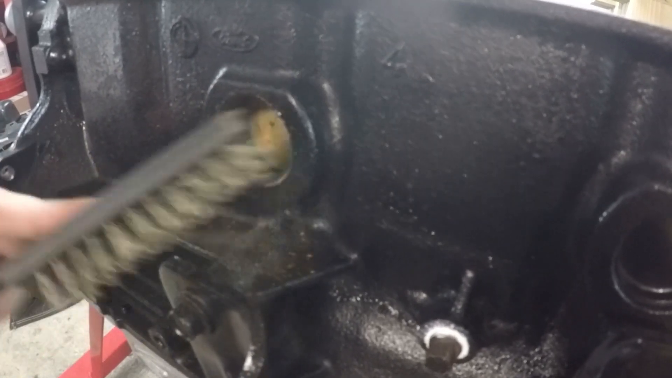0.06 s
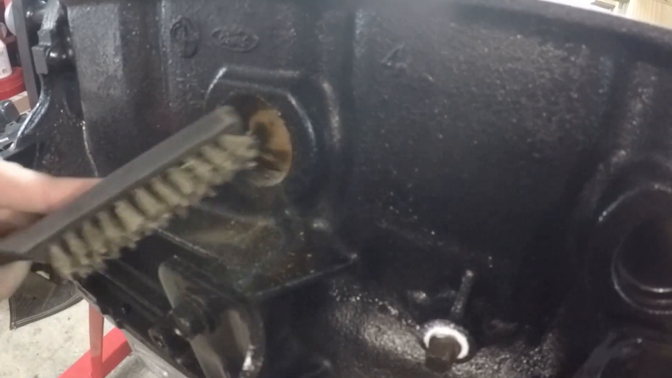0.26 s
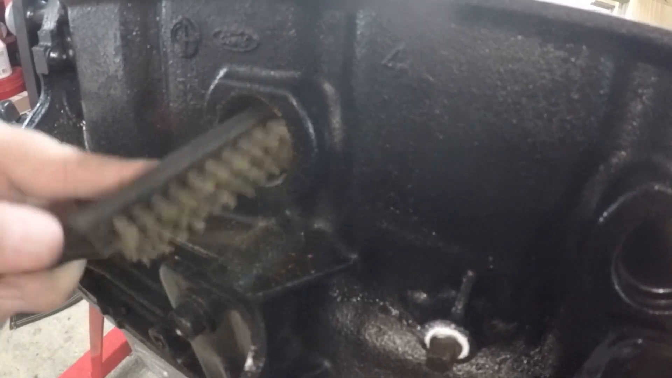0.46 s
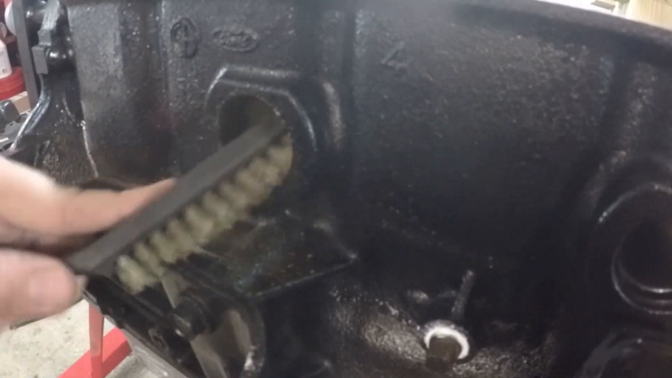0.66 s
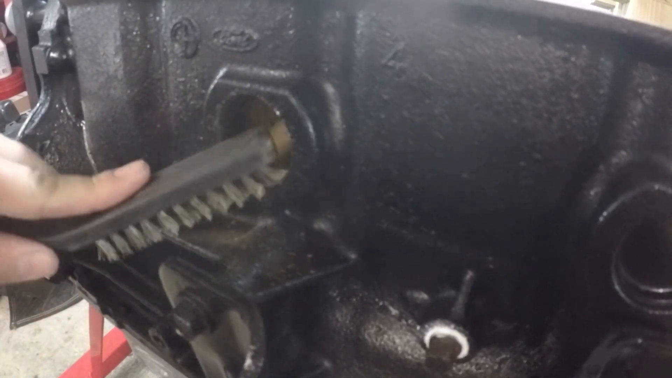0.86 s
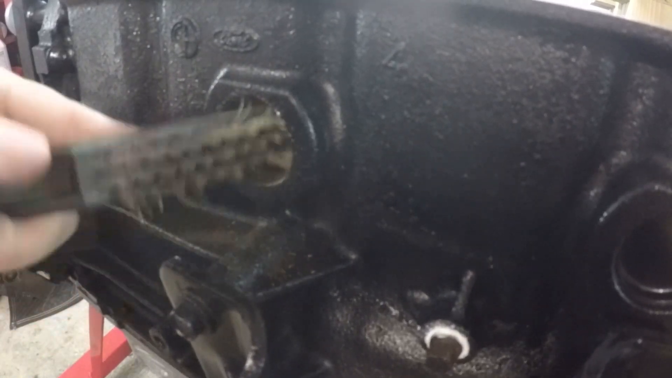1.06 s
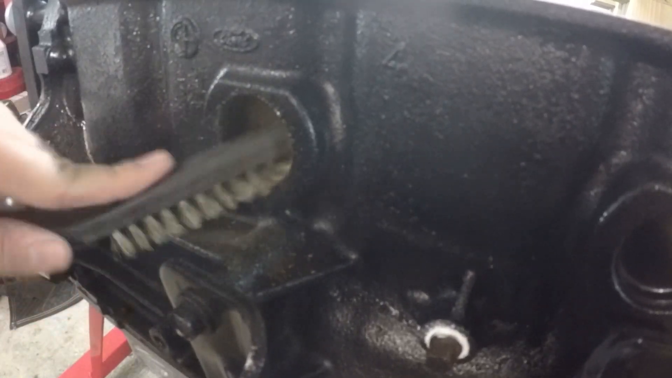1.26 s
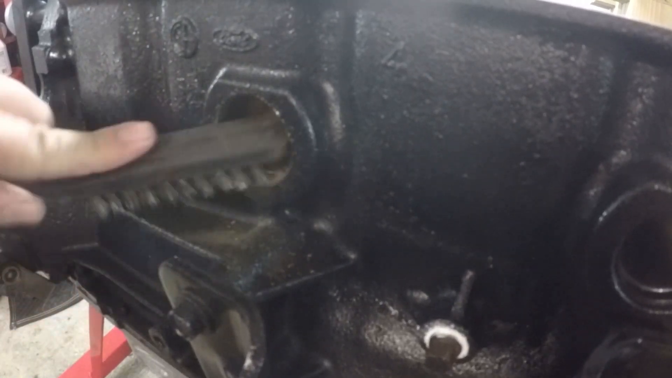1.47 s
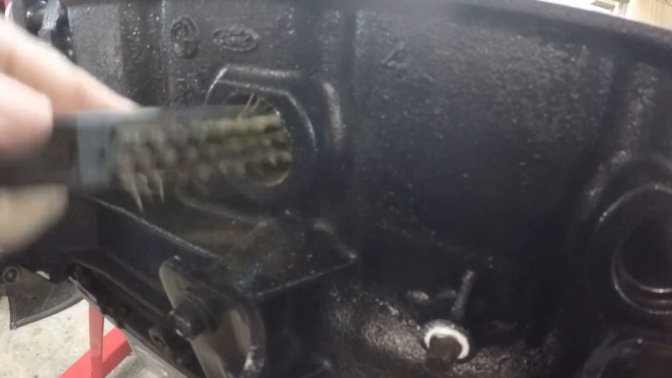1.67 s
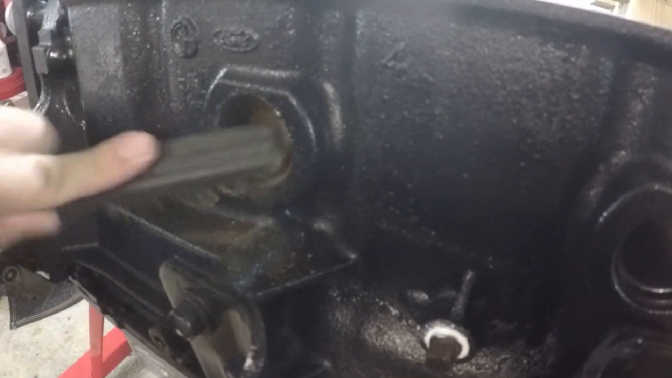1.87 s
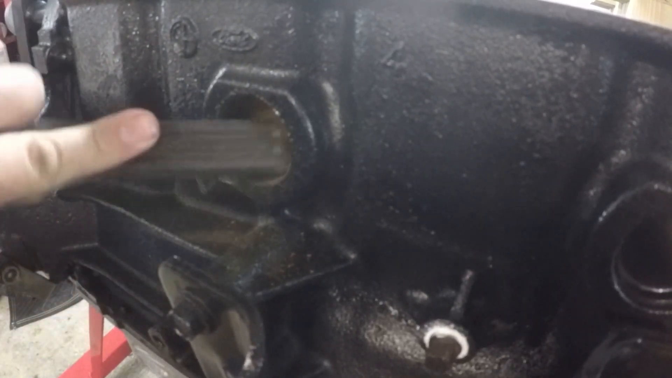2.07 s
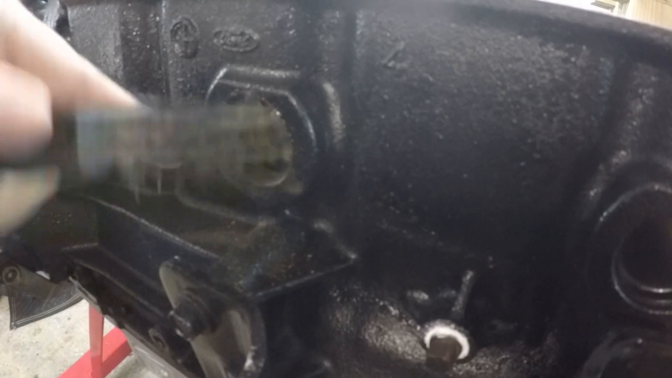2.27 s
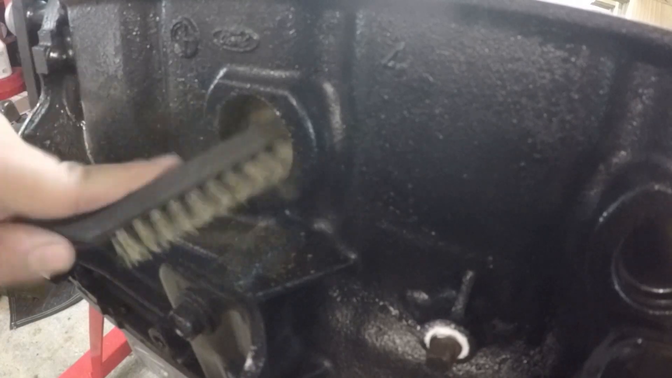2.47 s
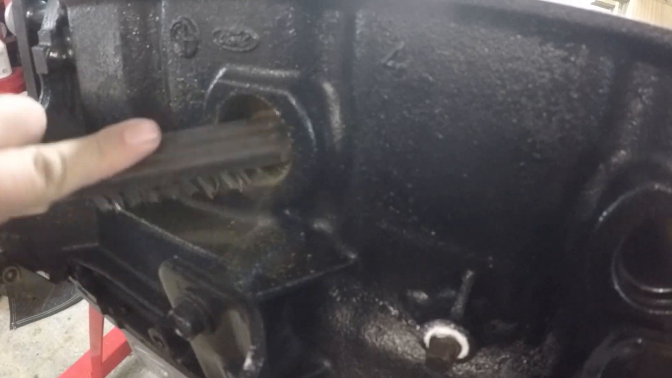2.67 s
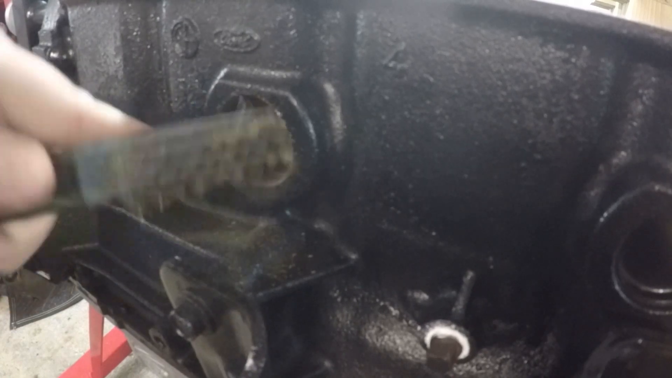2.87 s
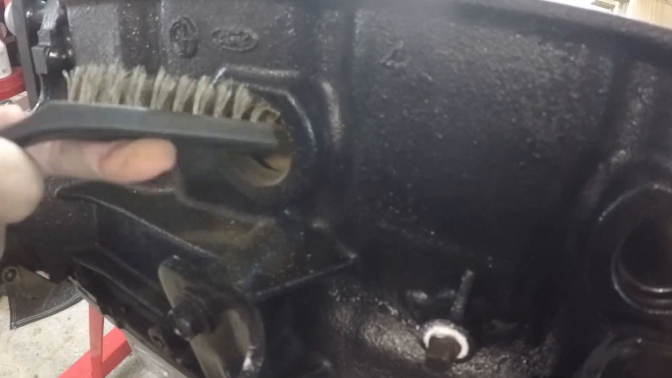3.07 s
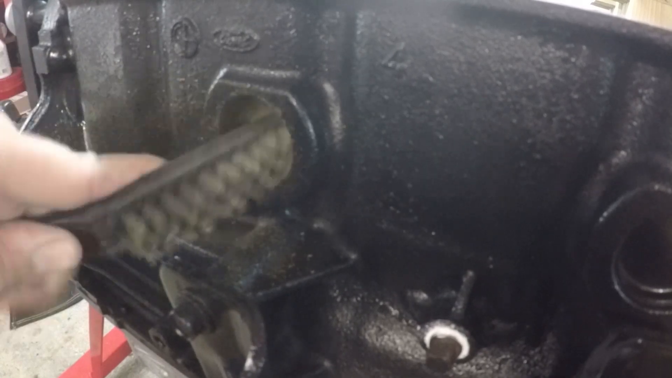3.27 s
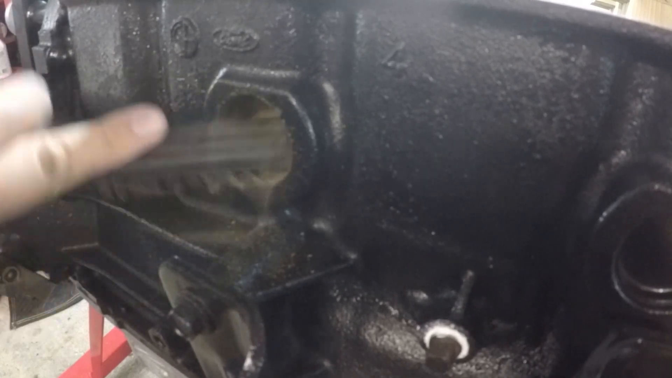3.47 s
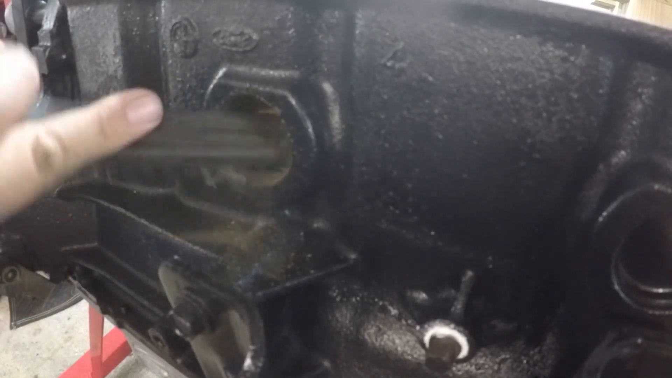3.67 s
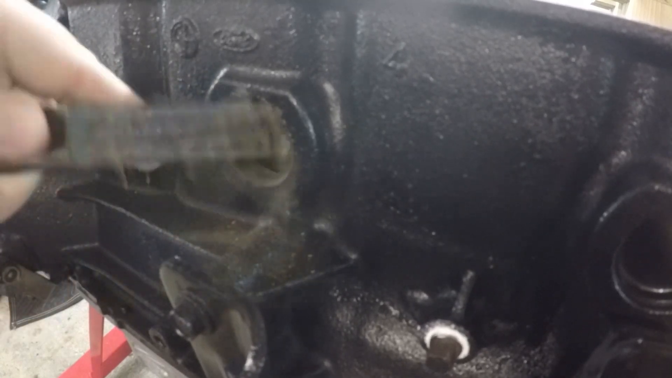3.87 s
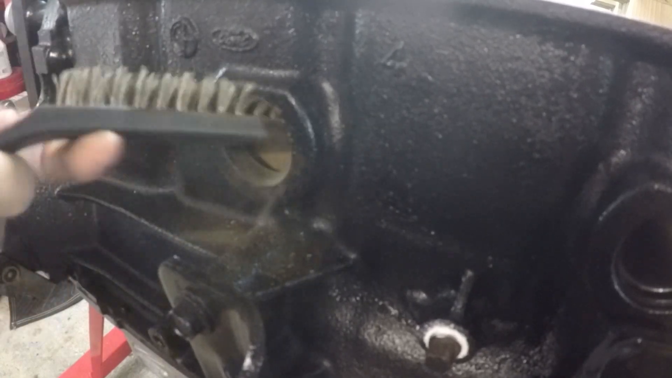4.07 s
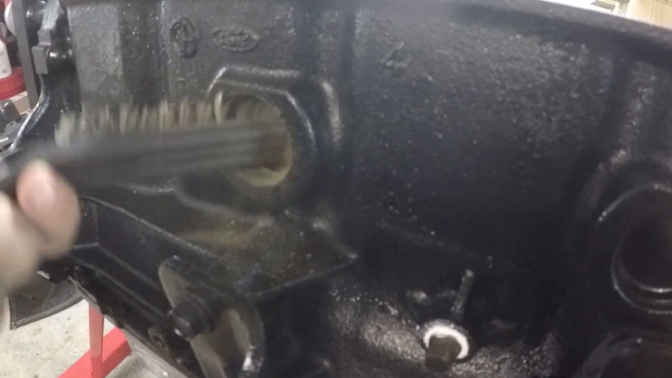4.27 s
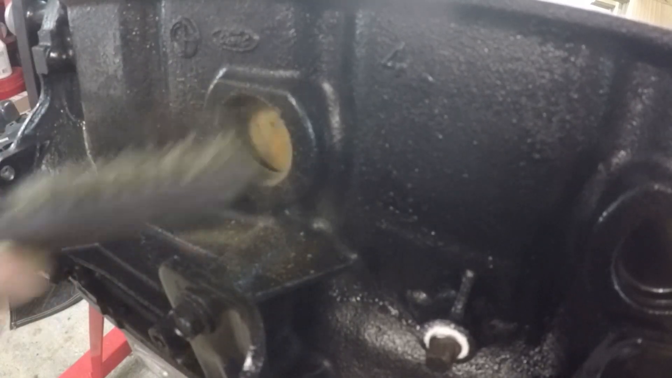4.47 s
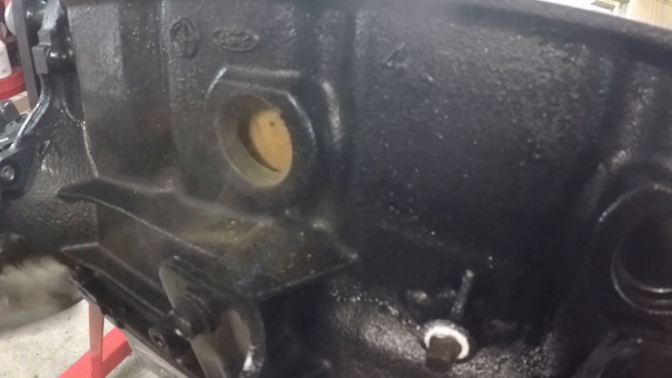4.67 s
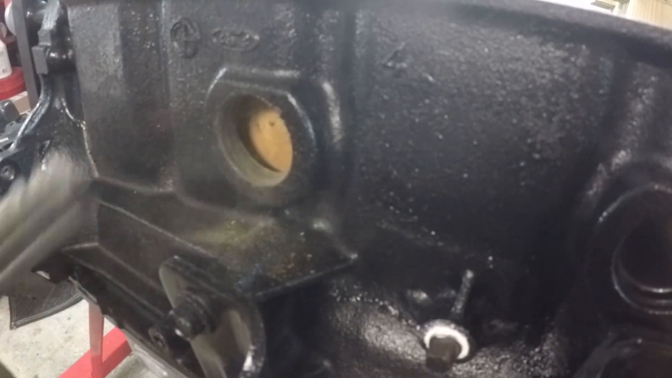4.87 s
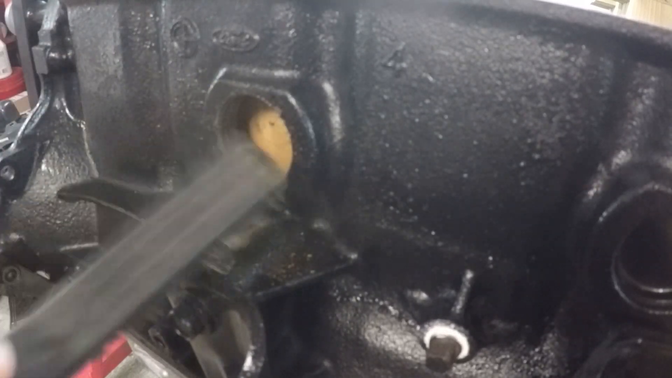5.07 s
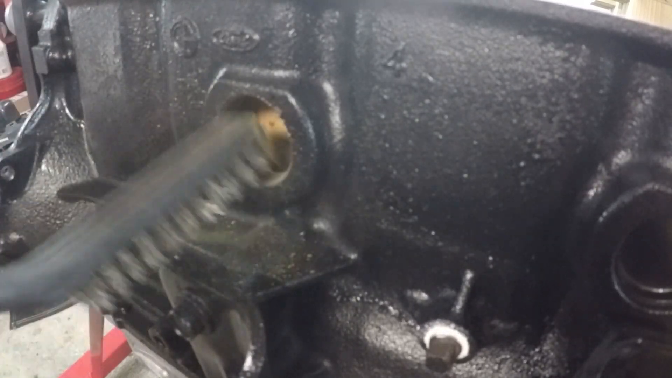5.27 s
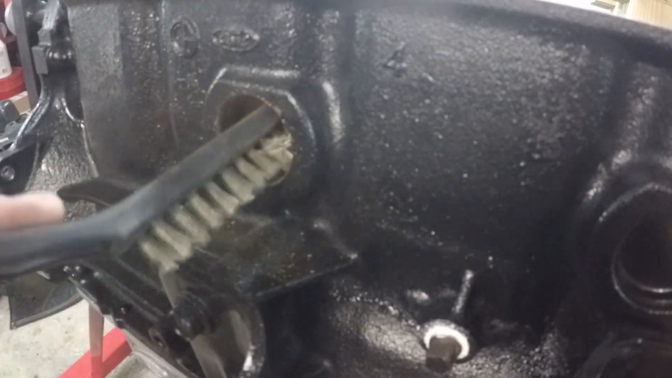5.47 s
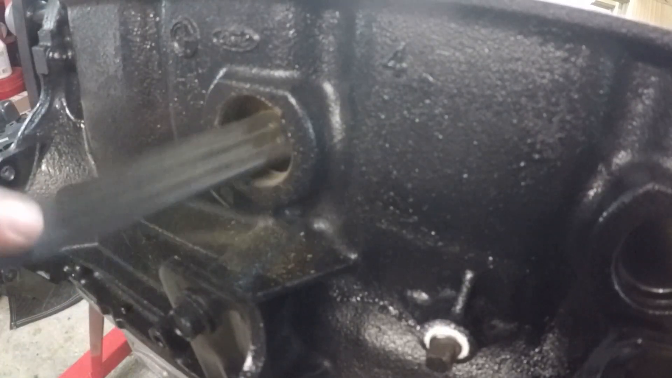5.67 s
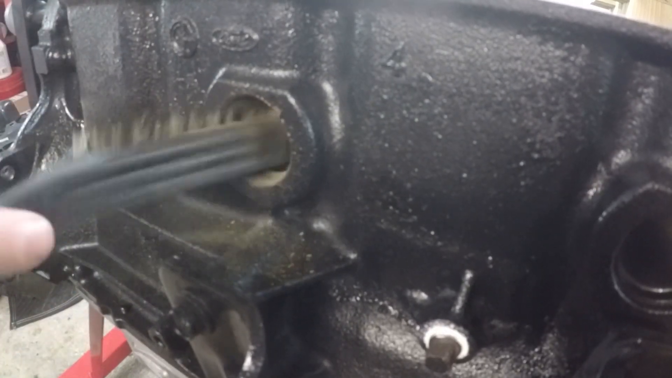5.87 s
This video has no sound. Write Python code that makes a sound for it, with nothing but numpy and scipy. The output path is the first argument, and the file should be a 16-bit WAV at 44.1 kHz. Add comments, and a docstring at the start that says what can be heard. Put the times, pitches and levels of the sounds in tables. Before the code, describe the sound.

A wire brush scrubs a hole in a cast-iron engine block with uneven, hissing, slightly hollow strokes. Bristles snap free and the handle knocks and rubs on the rim, making the iron ring faintly. After about four and a half seconds it stops on a sharp click. A pop hits the microphone, another click follows, and the scrubbing resumes. The sound is close, in a quiet garage.

```python
"""Wire brush in an engine block

A garage, one microphone close to a cast-iron block. A wire brush scrubs a bore in uneven strokes:
wire tips hiss and slip over the iron, tufts snap free and the bore sounds hollow. The handle
knocks and rubs the rim, the casting rings and its stand shakes. In a pause something pops
against the microphone. Faint room tone lies underneath."""
import sys
import numpy as np
from scipy import signal
from scipy.fft import rfft, irfft, next_fast_len
from scipy.io import wavfile
from scipy.ndimage import uniform_filter1d

SR = 44100
rng = np.random.default_rng(int(sys.argv[2]) if len(sys.argv) > 2 else 0)


def master_out(mix):
    """Clip the mix to full scale and print it as 16-bit PCM to the path in sys.argv[1]."""
    frames = np.transpose(np.atleast_2d(mix))
    ceiling = np.clip(frames, -1, 1)
    pcm = np.round(ceiling * 32767).astype(np.int16)
    wavfile.write(sys.argv[1], SR, pcm)


N = 260631
T = np.arange(N) / SR

# spectrum of wire tips on iron: f/Hz, level/dB
BRISTLE_SPECTRUM = [(1470, -18), (2500, -3), (2920, -12), (3690, 2), (4950, -1.5), (5520, 1.5), (6400, 2.5),
                    (11900, 2.5), (15300, -1), (15600, 21.5), (16000, -32)]


def brush_strokes():
    """Each stroke drives the wires, the hollow of the bore, the casting and the stand."""
    scrape_db, hollow_db, bright_db = stroke_pressure()
    rub = handle_rubs()
    load = gain_of(scrape_db - 21) + rub  # wires and handle bearing on the block
    wires = bristles(bright_db)
    bore = (gain_of(scrape_db + hollow_db) + gain_of(-10) * rub) * bore_hollow()
    force = noise() * (0.033 + slips(per_s=90, spread_db=0, t60=0.012)) * load
    ring = casting(force) / np.std(casting(noise()))
    stand = stand_rumble(load)
    return gain_of(scrape_db) * (wires + twisting_brush()) + bore + ring + stand


def stroke_pressure():
    """Scrape, hollow and brightness in dB: each stroke bites, swells, mostly sags, and lets go."""
    # start t/s, swell/s, sag/s, level/dB, change over the sag/dB, hollow/dB re scrape, treble tilt/dB
    strokes = [(-.05, 0.085, 0.021, -48.5, -11, -7, 0.5), (0.454, 0.039, 0.092, -57.5, -3, -1.5, 5),
               (.615, 0.044, 0.028, -52.5, 2, -5, 4), (.685, 0.034, 0.18, -45, -7.5, -12.5, -1),
               (0.967, 0.1, .09, -43.5, -11.5, -12, 0), (1.172, 0.057, 0.2, -44.5, -3, -12.5, -2),
               (1.512, 0.13, 0.077, -38, -7, -10.5, -1.5), (1.729, 0.15, 0.2, -44, -14, -9.5, 2.5),
               (2.069, 0.24, 0.07, -38.5, -1, -15.5, -2), (2.407, 0.092, 0.18, -44, -7, -14, 3),
               (2.745, 0.18, 0.22, -38.5, -9.5, -15.5, 0), (3.18, 0.068, .38, -39, -12.5, -14, -1),
               (3.699, 0.17, 0.34, -40.5, -6, -14.5, 0), (4.172, 0.067, 0.14, -45, -6, -14.5, -0.5),
               (4.404, 0.091, 0.042, -57.5, 1, -12, 3.5), (5.382, 0.2, 0.07, -46, -0.5, -16.5, 0),
               (5.624, 0.061, 0.072, -39.5, -5, -12, 3.5), (5.728, 0.075, 0.082, -40, -6.5, -15, 3.5),
               (5.857, 0.063, .08, -47.5, -3, -12.5, 4)]
    bite_db, attack_s, release_s = -7.5, 0.033, 0.04
    rest_db, touch_db = -66, -63  # wires quivering between strokes; wires resting on the iron
    in_bore = uniform_filter1d(1. * ((T > .9) & (T < 4.54)), size=800)
    power = gain_of(2 * rest_db) + gain_of(2 * touch_db) * in_bore
    hollow, bright = power * -3.5, power * -2  # tone at rest, weighted by power like the strokes
    for start, swell, sag, db, change_db, hollow_db, bright_db in strokes:
        top, end = start + swell, start + swell + sag
        contact = np.clip(np.minimum((T - start) / attack_s, (end - T) / release_s + .5), 0, 1)
        level_db = np.interp(T, [start, top, end], [db + bite_db, db, db + change_db])
        stroke_power = (contact * gain_of(level_db)) ** 2
        power += stroke_power
        hollow += stroke_power * hollow_db
        bright += stroke_power * bright_db
    return 10 * np.log10(power), hollow / power, bright / power


def bristles(bright_db):
    """Tips hiss and slip together; groups of wires ring in turns. bright_db tilts the treble."""
    # wire resonances of steady pitch: f/Hz, width/Hz, level/dB
    wire_modes = [(4954, 300, -2.5), (6580, 300, -3), (8270, 690, 1), (9780, 350, -2), (11290, 690, 0.5)]
    hiss = noise() * (0.8 + slips(per_s=240, spread_db=-0.5, t60=0.011))
    rings = sum(gain_of(db + 3.9 * drift(0.17)) * resonate(plucks(per_s=120), hz, width)
                for hz, width, db in wire_modes)
    wires = unit_rms(coloured(hiss, BRISTLE_SPECTRUM) + gain_of(-5.5) * unit_rms(rings))
    low = filtered(wires, 7000, "low")
    return low * gain_of(-bright_db / 2) + (wires - low) * gain_of(bright_db / 2)


def twisting_brush():
    """As the brush twists, single resonances of wires or bore swell, slide and fade."""
    # spells of ringing: from t/s, to t/s, centre f/Hz, level/dB re scrape
    spells = [(.08, 0.152, 528, 7), (0.409, 0.61, 1650, -10), (0.56, 0.71, 6620, 1),
              (0.654, 0.926, 8300, -7.5), (0.702, 1.053, 2420, -6.5), (1.049, 1.692, 8090, -9.5),
              (1.254, 1.586, 2290, -9), (1.495, 2.248, 5100, -20), (1.754, 2.547, 8200, -11),
              (1.849, 2.082, 2156, -10), (1.95, 2.301, 9100, -19), (2.101, 2.605, 3735, -15),
              (2.494, 2.95, 6540, -12), (2.596, 3.05, 5100, -11), (2.799, 3.35, 3800, -12),
              (2.808, 3.303, 1700, -24.5), (3.206, 3.336, 8300, -11), (3.271, 4.093, 6420, -9.5),
              (3.853, 4.098, 4870, -17), (4.041, 4.195, 3600, -9), (4.171, 4.393, 2965, -6),
              (4.43, 4.567, 3070, 3), (5.397, 5.528, 1438, -7), (5.402, 5.617, 9600, 4.5),
              (5.5, 5.845, 8050, -7), (5.542, 5.713, 6150, -10), (5.68, 5.912, 3606, -9.5)]
    max_slide = .04  # share of the pitch, either side of the centre
    out, bursts = np.zeros(N), plucks(per_s=220)
    for (start, end, centre_hz, db), way in zip(spells, rng.uniform(-1, 1, len(spells))):
        drive = bursts[round(start * SR):round(end * SR)]
        drive = drive * rng.choice([-1, 1], len(drive))
        hz = centre_hz * (1 + max_slide * way * np.linspace(-1, 1, len(drive)))
        width_hz = min(.12 * centre_hz, 220 + .045 * centre_hz)
        add(out, start, gain_of(db) * resonate(drive, hz, width_hz) * signal.windows.tukey(len(drive), .6))
    return out


def bore_hollow():
    """Slipping wires sound the hollow of the bore and the handle."""
    # spectrum of bore and handle: f/Hz, level/dB
    hollow_spectrum = [(530, 1), (900, 3.5), (1010, 4), (1130, 1), (1720, 3.5), (2200, 1.5), (3780, -1),
                       (4500, -4), (5850, -5), (9900, -120)]
    return coloured(noise() * (1.04 + slips(per_s=150, spread_db=3.5, t60=0.02)), hollow_spectrum)


def handle_knocks():
    """The handle hits the rim: a short crack, a rattle after it, and the casting struck."""
    # blows on the rim: t/s, level/dB, f/Hz, crack length/s, casting ring/dB re level
    knocks = [(0.194, -33.5, 850, 0.0015, -26), (0.45, -36, 982, 0.0015, -6), (.472, -32, 1500, 0.0018, -2),
              (0.487, -21.5, 1750, 0.0014, -13), (0.829, -26.5, 1480, 0.0015, -10),
              (1.055, -43, 870, 0.0046, 8), (1.211, -45.5, 600, 0.0011, 1), (1.284, -42.5, 800, 0.001, 2),
              (1.557, -15.5, 2080, 0.0011, -22), (1.625, -22.5, 1780, 0.0014, -13),
              (1.847, -47, 895, 0.0027, 10.5), (1.919, -46.5, 890, 0.0018, 5),
              (2.253, -21, 1630, 0.0015, -10.5), (2.331, -41, 900, 0.00099, -2),
              (2.423, -45, 706, 0.0018, -1), (2.544, -38, 810, 0.0012, -1.5),
              (3.343, -39.5, 1000, 0.0021, -24), (3.401, -42, 894, 0.0016, 5),
              (3.537, -53.5, 894, 0.0014, 15), (3.569, -45.5, 900, 0.0024, 9),
              (4.4987, -12, 2890, 0.0019, -26.5), (5.3886, -10, 2510, 0.00062, -30),
              (5.52, -26, 1750, 0.0012, -11.5), (5.562, -39, 894, 0.0025, -4.5)]
    out, blows, t = np.zeros(N), np.zeros(N), T[:1500]
    for start, db, hz, length, ring_db in knocks:
        progress = np.minimum(t / length, 1)
        tone = np.sin(2 * np.pi * hz * t) + 0.19 * np.sin(4 * np.pi * hz * t)
        crack = tone * np.sin(np.pi * progress) ** 2
        rattle = unit_rms(filtered(noise(len(t)), [hz / 3.9, hz * 1.3], "band"))
        rattle *= gain_of(-6) * decay(t, t60=0.011) * progress ** 2
        add(out, start, gain_of(db) * (crack + rattle))
        blow = np.exp(-2 * np.pi * hz * t)  # a duller knock pushes longer and wakes fewer high modes
        add(blows, start, gain_of(db + ring_db) * blow / blow.sum())
    return out + casting(blows)


def handle_rubs():
    """Gain of the handle rubbing the rim, swelling and fading in each spell."""
    # rubs on the rim: from t/s, to t/s, level/dB
    rubs = [(0.06, 0.4, -62), (0.386, 0.517, -49), (0.752, 0.91, -58), (0.952, 1.098, -53),
            (1.28, 1.456, -53), (1.515, 1.67, -69), (1.82, 2.12, -55), (2.116, 2.303, -48.5),
            (2.536, 2.681, -55.5), (2.835, 2.984, -56.5), (3.188, 3.26, -55), (3.38, 3.633, -53.5),
            (3.68, 3.948, -57), (4.47, 4.554, -65), (5.512, 5.596, -53.5), (5.69, 5.82, -53.5)]
    return sum(gain_of(db) * np.sin(np.pi * np.clip((T - start) / (end - start), 0, 1))
               for start, end, db in rubs)


def tuft_snaps():
    """A tuft springs free: a burst of bristle hiss with its own group of wires ringing on top."""
    # single tufts: t/s, level/dB
    snaps = [(0.0275, -33), (0.2506, -38), (0.519, -27.5), (0.5455, -29.5), (0.5727, -27), (.621, -38),
             (0.6364, -35), (0.6502, -29.5), (0.7003, -24.5), (0.8852, -31), (0.9902, -29.5),
             (1.0307, -27.5), (1.136, -25), (1.1892, -33), (1.2015, -25), (1.7725, -27.5), (1.8003, -28),
             (2.172, -23.5), (2.4074, -31), (2.7035, -40), (2.7684, -40), (3.1334, -28), (3.199, -33),
             (3.475, -29.5), (3.711, -34), (3.931, -22.5), (4.312, -32), (4.436, -35), (4.4982, -31.5),
             (4.79, -47), (4.91, -47.5), (5.1422, -28), (5.235, -44), (5.3497, -44), (5.373, -38),
             (5.423, -29), (5.442, -29.5), (5.4834, -35), (5.5019, -25), (5.5109, -23.5), (5.5358, -43),
             (5.563, -20.5)]
    # rushes of small tufts as the brush is forced in or out: from t/s, to t/s, lowest level/dB
    flurries = [(.95, 1.15, -33.5), (4.414, 4.545, -38.5), (5.392, 5.56, -31)]
    out, t = np.zeros(N), T[:1500]
    hiss = coloured(noise(), BRISTLE_SPECTRUM)
    tufts = snaps + [(start + when * (end - start), db + 4 * force)
                     for start, end, db in flurries for when, force in rng.random((8, 2))]
    for (start, db), (pitch, slow) in zip(tufts, rng.random((len(tufts), 2))):
        wires = resonate(noise(len(t)), 5000 + 7000 * pitch, width_hz=3000)
        burst = unit_rms(np.resize(hiss[round(start * SR):], len(t)) + 0.61 * wires)
        envelope = np.minimum(t / 0.0019, 1) * decay(t, t60=0.0074 + 0.0097 * slow)
        add(out, start, gain_of(db) * envelope * burst)
    return out


def casting(force):
    """The block rings in all its modes; neighbours swing against each other, so little bass escapes."""
    # modes of the iron: f/Hz, level/dB, t60/s
    modes = [(421, -7, .07), (492, -10, .07), (718, -2, .125), (840, -12, .1), (891, -11, .12),
             (986, -11, .1), (1373, -15, .08), (1700, -15, .1), (2300, -17, .07), (2900, -17, .05),
             (3200, -18, .05), (5100, -22, .05)]
    t = T[:SR // 4]
    ring = sum((-1) ** k * gain_of(db) * decay(t, t60) * np.sin(2 * np.pi * hz * t)
               for k, (hz, db, t60) in enumerate(modes))
    return signal.oaconvolve(force, filtered(ring, 290, "high"))[:N]


def microphone_pop():
    """Something pops against the microphone: a sharp step whose swing slows down at once."""
    out, t = np.zeros(N), T[:4000]
    swing = np.cos(3.29 * np.log(1 + t / .00045)) * np.exp(-t / .0046)
    push = .49 * t / .0028 * np.exp(1 - t / .0028)
    step = 1.1 * np.exp(-t / .00005)
    add(out, 5.17755, gain_of(-21.2) * (swing + push + step))
    return out


def stand_rumble(load):
    """The stand shakes under the strokes, more as the load grows."""
    # spectrum of the shaking stand: f/Hz, level/dB
    rumble_spectrum = [(12, -23), (20, 2), (52, 7.5), (107, -2.5), (289, -8.5), (353, -36), (400, 2),
                       (520, -3), (880, -120)]
    return coloured(noise(), rumble_spectrum) * load ** 0.35 * gain_of(-46.5 + 4.3 * drift(0.059))


def stand_thumps():
    """Jolts pass through the stand as low, quickly damped thumps."""
    # jolts: t/s, level/dB, f/Hz
    thumps = [(2.249, -49, 45.8), (3.258, -45, 75.4), (3.517, -47, 81.7), (5.141, -38, 60),
              (5.389, -51, 85.5), (5.566, -35, 44)]
    out, t = np.zeros(N), T[:4000]
    for start, db, hz in thumps:
        add(out, start, gain_of(db) * decay(t, t60=0.053) * np.sin(2 * np.pi * hz * t))
    return out


def garage_reflections(x):
    """The garage returns sparse echoes of random sign that die quickly."""
    taps = np.zeros(SR // 2)
    delays = np.arange(200, len(taps) - 20, 20)
    delays += rng.integers(0, 20, len(delays))
    taps[delays] = rng.choice([-1., 1.], len(delays)) * decay(delays / SR, t60=0.073)
    return signal.oaconvolve(x, taps / np.linalg.norm(taps))[:N]


def room_tone():
    """Garage air and microphone noise, wavering slightly in level."""
    # spectrum of the noise floor: f/Hz, level/dB
    air_spectrum = [(15, -66), (25, 6.5), (64, -6), (97, -3), (149, -4.5), (190, 1.5), (217, 0), (309, -5),
                    (1370, -28), (14800, -31), (16000, -41)]
    return gain_of(-68 + 2.4 * drift(0.11)) * coloured(noise(), air_spectrum)


def slips(per_s, spread_db, t60):
    """Envelope of random slips, each starting at once and dying in t60 seconds; rms 1."""
    sizes = gain_of(spread_db * np.minimum(rng.exponential(1, N), 4)) * (rng.random(N) < per_s / SR)
    power = signal.lfilter([1], [1, -1e-6 ** (1 / (t60 * SR))], sizes ** 2)
    return unit_rms(np.sqrt(power))


def plucks(per_s):
    """Noise in small bursts."""
    return noise() * (.5 + slips(per_s, spread_db=2.5, t60=0.011))


def resonate(x, hz, width_hz):
    """Noise x ringing around hz, a steady pitch or a curve; rms 1."""
    carrier = np.exp(2j * np.pi * np.cumsum(hz * np.ones(len(x))) / SR)
    pole = np.exp(-np.pi * width_hz / SR)
    return unit_rms((carrier * signal.lfilter([1 - pole], [1, -pole], x)).real)


def coloured(x, spectrum):
    """Filters x by a spectrum drawn on a log-frequency axis; rms 1."""
    hz, db = np.transpose(spectrum)
    size = next_fast_len(N)
    curve_db = np.interp(np.log(np.fft.rfftfreq(size, 1 / SR) + 1), np.log(hz), db)
    return unit_rms(irfft(rfft(x, size) * gain_of(curve_db), size)[:N])


def drift(seconds):
    """Slow random wander; rms 1."""
    size = round(seconds * SR)
    return unit_rms(uniform_filter1d(uniform_filter1d(noise(), size), size))


def filtered(x, hz, kind):
    return signal.sosfilt(signal.butter(2, hz, kind, fs=SR, output="sos"), x)


def noise(size=N):
    return rng.standard_normal(size)


def decay(t, t60):
    return gain_of(-60 * t / t60)


def gain_of(db):
    return 10 ** (np.asarray(db) / 20)


def unit_rms(x):
    return x / np.sqrt(np.mean(x ** 2) + 1e-20)


def add(mix, start_s, sound):
    part = mix[round(start_s * SR):][:len(sound)]
    part += sound[:len(part)]


def scene():
    """Brush and block close up, the garage well behind; one microphone on both channels."""
    brush = brush_strokes() + handle_knocks() + tuft_snaps()
    background = room_tone() + gain_of(-14) * garage_reflections(brush)
    return np.tile(brush + microphone_pop() + stand_thumps() + background, (2, 1))


def record(dry):
    """The microphone's bass cut and steep upper band limit."""
    bass_cut_hz, edge_hz = 22, 15350
    band_limit = signal.firwin(511, edge_hz, window=("kaiser", 7), fs=SR)
    return signal.oaconvolve(filtered(dry, bass_cut_hz, "high"), band_limit[None], "same")


dry = scene()
out = record(dry)
master_out(out)
```